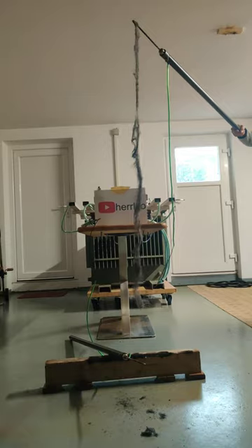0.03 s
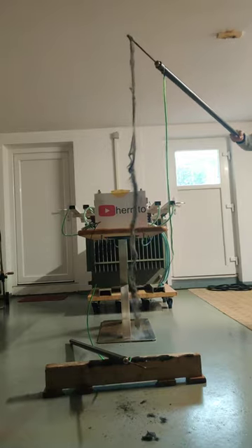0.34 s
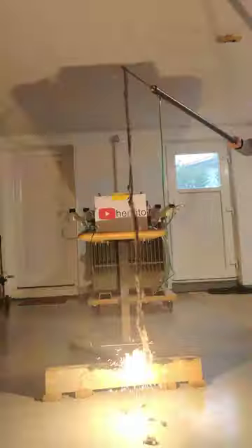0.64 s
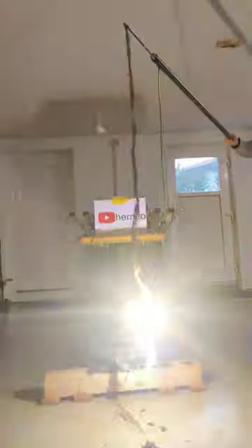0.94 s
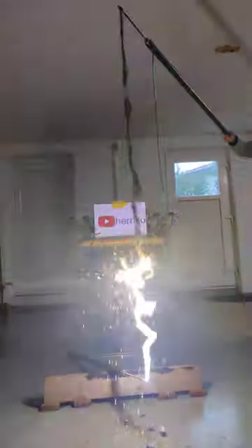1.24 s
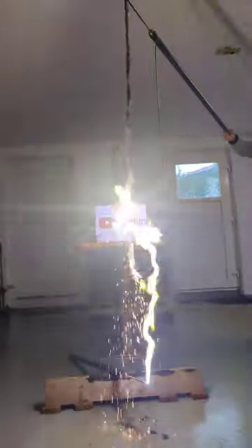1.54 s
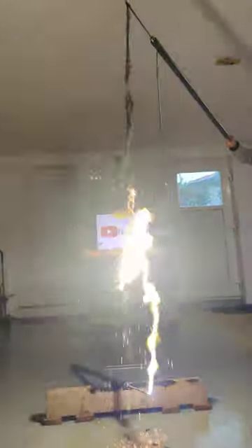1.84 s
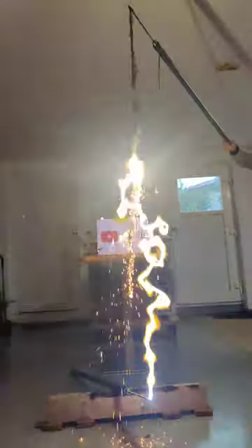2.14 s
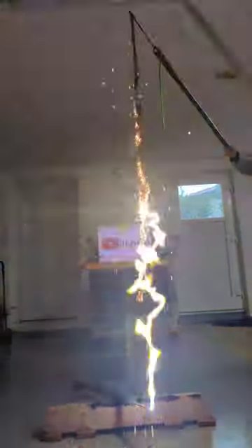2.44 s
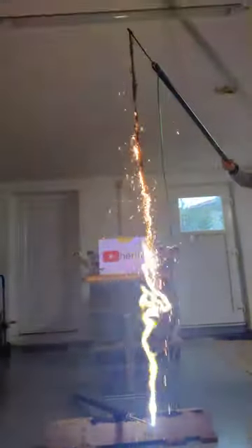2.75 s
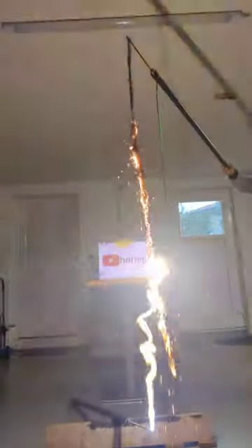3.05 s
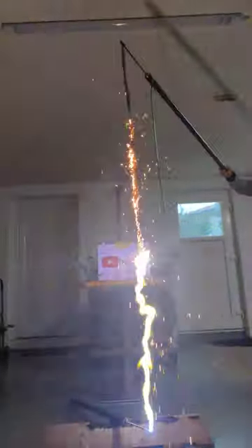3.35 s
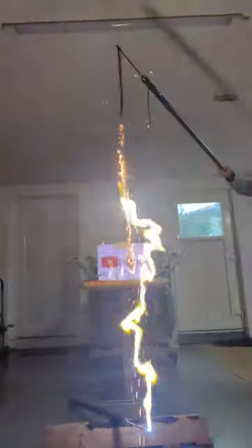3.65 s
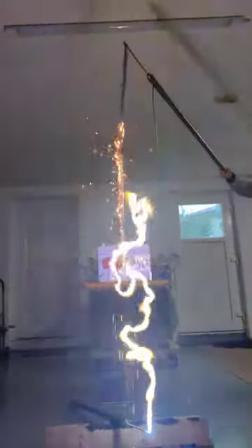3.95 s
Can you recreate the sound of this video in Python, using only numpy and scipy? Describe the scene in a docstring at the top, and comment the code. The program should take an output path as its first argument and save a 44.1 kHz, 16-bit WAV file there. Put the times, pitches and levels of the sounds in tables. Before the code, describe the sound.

A high-voltage arc buzzes loudly in a hard-walled room. It strikes with a spit of hiss after a faint hum, then swells into an uneven rasp with sharp cracks, crackling and the sizzle of burning wire wool.

```python
"""A transformer hums faintly in a hard-walled room. At 0.57 s a high-voltage arc strikes a hanging
strand of wire wool with a spit of hiss. The wool flares and sizzles, its flame stirs the room's low
modes, and the first sharp cracks sound as loops of the channel short out. From 0.86 s the arc buzzes,
one pressure pulse to each ripple of the rectified supply, louder as its channel lengthens.
From 1.2 s countless small collapses add a crackle."""
import sys
import numpy as np
from scipy import signal
from scipy.fft import rfft, irfft, next_fast_len
from scipy.io import wavfile
from scipy.ndimage import map_coordinates

SR = 44100
rng = np.random.default_rng(int(sys.argv[2]) if len(sys.argv) > 2 else 0)


def digitize_waveform(pressure):
    """Quantize a signal to 16-bit integers and store it at the path in sys.argv[1].

    Rows of a 2-D input are taken as channels; values are limited to [-1, 1].
    """
    field = np.atleast_2d(pressure).T
    bounded = np.clip(field, -1, 1)
    quanta = np.round(bounded * 32767).astype(np.int16)
    wavfile.write(sys.argv[1], SR, quanta)


N = 176400
T = np.arange(N) / SR
BURN_START_S, BURN_RISE_S = 0.633, 0.021
LEFT_RIGHT = np.array([[.5], [-.5]])  # shares a difference between the two channels
# strength of the arc: t/s, relative level/dB
ARC_STRENGTH = [(.88,-38),(1.0,-30),(1.12,-27.5),(1.3,-27),(1.5,-22.5),(1.79,-19),(1.83,-39),(1.895,-24),(1.915,-18.5),(2.095,-18.5),(2.12,-50),(2.195,-29),(2.22,-19),(2.33,-17),(2.34,-33),(2.41,-37),(2.44,-21),(2.69,-18.5),(2.79,-24.5),(2.92,-36.5),(2.95,-23),(3.05,-27.5),(3.26,-19),(3.41,-26),(3.44,-21),(3.54,-19.5),(3.57,-27.5),(3.7,-19.5),(3.875,-21),(3.893,-53),(4.0,-21)]


def amp(db):
    """Amplitude ratio of a level in decibels."""
    return 10 ** (np.asarray(db) / 20)


def unit(x):
    """Normalisation to an rms of 1."""
    return x / np.sqrt(np.mean(x ** 2) + 1e-20)


def along(points, hz):
    """Interpolation of (f/Hz, value) points on a logarithmic frequency axis."""
    f, values = np.transpose(points)
    return np.interp(np.log(hz + 1), np.log(f + 1), values)


def curve(points):
    """Linear interpolation of (t/s, value) points at every sample."""
    return np.interp(T, *np.transpose(points))


def fade_in(start_s, rise_s):
    """Linear onset from 0 to 1."""
    return np.clip((T - start_s) / rise_s, 0, 1)


def wobble(knots_per_s):
    """Random modulation: a spline through Gaussian values."""
    return map_coordinates(rng.standard_normal(1000), [T * knots_per_s], mode="mirror")


def filtered(x, response):
    """Linear filtering: the spectrum is multiplied by a frequency response."""
    size = next_fast_len(N + SR // 2)
    return irfft(rfft(x, size) * response(np.fft.rfftfreq(size, 1 / SR)), size)[..., :N]


def coloured(x, spectrum):
    """Zero-phase shaping by (f/Hz, level/dB) points."""
    return filtered(x, lambda hz: amp(along(spectrum, hz)))


def clicks(x, spectrum, size=4096):
    """Minimum-phase shaping: each impulse becomes a causal click of this spectrum and the same peak."""
    cepstrum = irfft(np.log(amp(along(spectrum, np.fft.rfftfreq(size, 1 / SR)))))
    cepstrum[1:size // 2] *= 2
    cepstrum[size // 2 + 1:] = 0
    click = irfft(np.exp(rfft(cepstrum)))
    return signal.fftconvolve(x, click / np.abs(click).max())[:N]


def impulses(times, sizes):
    """Fractional delay: each impulse is shared between two neighbouring samples."""
    at = np.clip(times * SR, 0, N)
    i = at.astype(int)
    before = np.bincount(i, sizes * (1 - at + i), N + 2)[:N]
    after = np.bincount(i + 1, sizes * (at - i), N + 2)[:N]
    return before + after


def decays(x, t60_s):
    """Exponential decay: each impulse starts an envelope that falls 60 dB in t60_s."""
    return signal.fftconvolve(x, amp(-60 * T[:SR // 4] / t60_s))[:N]


def grains(per_s, spread_db):
    """A Poisson process of impulses, a few much larger than the rest."""
    occurs = rng.random(N) < per_s / SR
    return occurs * amp(spread_db * np.minimum(rng.exponential(size=N), 4))


def diffuse(pair, hz):
    """Diffuse-field coherence: two independent spectra mix to a left and right alike at long waves."""
    # likeness of left and right: f/Hz, correlation
    coherence = [(60, 0.94), (250, 0.91), (500, 0.13), (1000, 0.033), (3000, 0.0067), (15000, 0.0074)]
    angle = np.arccos(np.clip(along(coherence, hz), -1, 1)) / 2
    mid, side = pair[0] * np.cos(angle), pair[1] * np.sin(angle)
    return np.array([mid + side, mid - side])


def diffuse_noise():
    """White noise at two points of a diffuse field."""
    spectra = rfft(rng.standard_normal((2, N)))
    return irfft(diffuse(spectra, np.fft.rfftfreq(N, 1 / SR)), N)


def room(x, wet_db, changes=5, size=16384):
    """Reverberation: direct sound plus a decaying tail that changes as the arc writhes about."""
    # reverberation time: f/Hz, T60/s
    t60 = [(100, 0.46), (500, 0.77), (2000, 0.27), (6000, 0.52), (15000, .2)]
    reverb = np.zeros((2, N + size))
    step = N // changes
    for centre in range(0, N + 1, step):
        hz, t, noise = signal.stft(rng.standard_normal((2, size)), SR, nperseg=256)
        decay = amp(-60 * t / along(t60, hz)[:, None])
        build_up = 1 - np.exp(-t / 0.0013)
        tail = signal.istft(diffuse(noise, hz[:, None]) * decay * build_up, SR, nperseg=256)[1][:, :size]
        start, end = max(centre - step, 0), min(centre + step, N)
        crossfade = np.cos(np.pi / 2 * (np.arange(start, end) - centre) / step)
        wet = signal.fftconvolve(x[None, start:end] * crossfade, tail / np.linalg.norm(tail[0]), axes=1)
        reverb[:, start:start + wet.shape[1]] += wet
    return (x + amp(wet_db - 0.5) * reverb[:, :N]) / np.hypot(1, amp(wet_db))


def floor_bounce(x, delay_s=.0032, echo_db=-4):
    """Comb filtering: the reflection off the concrete floor interferes with the direct sound."""
    return filtered(x, lambda hz: 1 + amp(echo_db) * np.exp(-2j * np.pi * hz * delay_s))


def arc_gain(exponent, reference_db=-20.5):
    """Power law: the gain of a layer that grows with the arc's strength."""
    return amp(exponent * (curve(ARC_STRENGTH) - reference_db)) * fade_in(BURN_START_S, BURN_RISE_S)


def hum():
    """A line spectrum from the mains transformer, louder on the right, over the room's ambient noise."""
    # transformer partials: f/Hz, level/dB
    partials = [(150.7, -84), (247.6, -66.5), (301.5, -71), (349.9, -74.5), (452.2, -84), (500.6, -84),
                (597.5, -87)]
    # ambient spectrum: f/Hz, relative level/dB
    ambient_spectrum = [(15,-0.5), (28,6.5), (60,-10), (150,-18), (400,-18.5), (800,-25), (2000,-26),
                        (7500,-35), (15500,-32)]
    tones = sum(amp(db) * np.sqrt(2) * np.sin(2 * np.pi * (hz * T + rng.random())) for hz, db in partials)
    ambient = amp(-59) * unit(coloured(diffuse_noise(), ambient_spectrum))
    return (amp(0.5 - 3 * LEFT_RIGHT) * tones + ambient) * fade_in(0.032, 0.0043)


def boom():
    """Forced resonance: the unsteady flame drives the room's low modes."""
    # room modes: f/Hz, bandwidth/Hz, relative level/dB
    modes = [(62, 6, 0), (95, 11, -5), (125, 16, -10), (158, 10, -7), (192, 10, -4), (220, 10, -5)]
    # envelope of the boom: t/s, level/dB
    level = [(.68,-57),(1.1,-48),(1.15,-38.5),(1.45,-34),(1.9,-46),(2.1,-30),(2.25,-38),(2.5,-31),(2.9,-35.5),(3.4,-33.5),(4,-35.5)]

    def response(hz):
        return sum(amp(db) * 1j * hz * width / (f0 * f0 - hz * hz + 1j * hz * width)
                   for f0, width, db in modes)

    rumble = unit(filtered(diffuse_noise(), response))
    return rumble * amp(curve(level)) * fade_in(BURN_START_S, BURN_RISE_S)


def sizzle():
    """Shot noise: fine fibres of the wool burst into sparks, whose clicks merge."""
    # envelope of the sizzle: t/s, relative level/dB
    level = [(.68,-30.5),(.82,-34),(.92,-37.5),(1.1,-33.5),(1.14,-27.5),(1.25,-31),(1.3,-27),(1.5,-27),(1.8,-23.5),(1.89,-30.5),(1.93,-24),(2.1,-29),(2.13,-32.5),(2.2,-28),(2.24,-27),(2.33,-21),(2.38,-30),(2.46,-29),(2.72,-23.5),(2.92,-31),(2.97,-26.5),(3.4,-31.5),(3.6,-25.5),(3.86,-24.5),(3.92,-38),(4,-31)]
    # spectrum of one spark: f/Hz, relative level/dB
    spectrum = [(25,-38), (70,-7), (180,-7), (320,-3), (550,-3.5), (1450,-0.5), (2500,-1.5), (3400,-6.5),
                (5000,-6), (6500,-12.5), (8800,-21), (12000,-16), (15500,-7.5)]
    sparks = grains(per_s=5000, spread_db=6.5) * rng.choice([-1, 1], N)
    envelope = amp(curve(level) + 2.5 + 1.7 * wobble(45)) * fade_in(BURN_START_S, BURN_RISE_S)
    return unit(clicks(sparks, spectrum)) * envelope


def crackle():
    """Random rarefaction pulses: countless small collapses, once the channel is long enough to loop."""
    # spectrum of one collapse: f/Hz, relative level/dB
    spectrum = [(10,-43), (35,-9), (70,-1), (150,-25.5), (350,0.5), (700,1), (1100,-4), (1500,0.5),
                (2500,-7.5), (3500,-12.5), (5000,-16), (8000,-30.5), (15000,-43)]
    pops = unit(floor_bounce(clicks(-grains(per_s=1500, spread_db=3.0), spectrum)))
    flicker = amp(-28.5 + 3.7 * wobble(25.1))
    return pops * flicker * arc_gain(exponent=0.72) * fade_in(1.2, 0.011)


def ignition(strike_s=.5688, flare_s=0.667):
    """Amplitude-modulated noise: the first spark, its spit of hiss, and a flare as the wool catches."""
    # spectrum of the hiss: f/Hz, relative level/dB
    spectrum = [(30,-35), (120,-11), (400,-18.5), (1500,-15.5), (2500,-7.5), (3900,-15.5), (5000,-2.5),
                (7000,-11.5), (9000,-14.5), (11600,-7.5), (12900,-1), (15600,0.5)]
    spark_t60_s, spit_t60_s = 0.032, 0.76
    flare_hold_s, fall_db_per_s = 0.19, 130
    age = np.maximum(T - strike_s, 0)
    spark = amp(-15 - 60 * age / spark_t60_s)
    spit = amp(-24 - 60 * age / spit_t60_s)
    fall_db = fall_db_per_s * np.maximum(T - flare_s - flare_hold_s, 0)
    flare = amp(-33 - fall_db + 1.6 * wobble(76.4)) * fade_in(flare_s, .004)
    envelope = (spark + spit) * fade_in(strike_s, 0.00044) + flare
    return unit(coloured(rng.standard_normal(N), spectrum)) * envelope


def cracks():
    """Pressure transients: a loop shorts out, the old channel collapses with a thump, the new snaps."""
    # short circuits: t/s, relative thump level/dB, relative snap level/dB
    shorts = [(0.7256, -16, -16), (0.7973, -28, -22), (0.816, -39, -19), (.845, -34, -22),
              (0.991, -25, -33), (1.127, -4.5, -26), (1.182, -11, -36), (1.2642, -10.5, -18),
              (1.2756, -17, -15), (1.324, -5, -19), (1.3608, -7, -21), (1.441, -8, -19), (1.534, -23, -30),
              (1.601, -5, -23), (1.703, -5, -14), (1.8104, 0.5, -16.5), (1.824, -29, -27),
              (2.063, 1.5, -29), (2.1124, -4, -16.5), (2.2583, 0, -25), (2.3421, -1, -13.5),
              (2.514, 0, -21.5), (2.573, -5, -19), (2.673, 0, -34), (2.6825, 0, -20.5),
              (2.8065, -3.5, -20.5), (2.8546, -3, -19.5), (2.9612, 2, -24), (3.0254, 1, -17.5),
              (3.172, -5, -21), (3.2814, -2.5, -24), (3.3404, -0.5, -16.5), (3.529, -6, -27),
              (3.5551, 1, -16), (3.831, 3.5, -30), (3.8908, -7, -16)]
    # spectra of thump and snap: f/Hz, relative level/dB
    thump_spectrum = [(8,-50), (30,1), (70,-4), (300,-1.5), (900,1.5), (1600,-3), (3000,-11.5), (5000,-8.5),
                      (9000,-47), (15000,-40)]
    snap_spectrum = [(300, -18), (2000, -3), (4000, -1), (6000, -1), (8500, -8), (12000, -2), (15500, 3)]
    times, thump_db, snap_db = np.transpose(shorts)
    collapses = impulses(times, -amp(thump_db - 1))
    ragged_tails = amp(-22) * decays(collapses, t60_s=0.03) * rng.standard_normal(N)
    thumps = floor_bounce(clicks(collapses + ragged_tails, thump_spectrum))
    snap_envelope = decays(impulses(times, amp(snap_db - 0.5)), t60_s=0.024)
    snaps = floor_bounce(snap_envelope * unit(coloured(diffuse_noise(), snap_spectrum)))
    in_room = room(thumps + amp(4) * snaps.mean(0), wet_db=5)
    return amp(-6) * thumps + snaps + amp(-2.5) * in_room


def buzz():
    """A harmonic pulse train: each current ripple emits a pulse, fuller and deeper from a strong arc."""
    # ripple frequency of the rectified supply: t/s, f/Hz
    ripple = [(.9,299.8),(1.3,300.4),(1.65,301.2),(1.8,301.8),(1.95,300.2),(2.08,300.6),(2.2,300.6),(2.32,302.4),(2.42,299.6),(2.8,299.9),(3.2,300.6),(3.52,302),(3.62,300.4),(3.85,301.4),(4,300)]
    # pulse spectra of a strong and a weak arc: f/Hz, relative level/dB
    full_spectrum = [(20,-60), (150,-24), (300,-7), (600,-1.3), (900,-.7), (1200,-6), (1500,-1), (1800,-11),
                     (2100,-16), (2400,-13.5), (3000,-16.5), (3500,-22), (5000,-24), (8000,-44)]
    thin_spectrum = [(20,-60), (150,-25), (300,-10), (600,-5), (900,-3), (1200,-9), (1500,1), (1800,-13),
                     (2100,-8), (2400,-13), (3000,-13), (4000,-22), (8000,-44)]
    wander_hz, jitter_s, scatter_db = 0.725, .00002, 1
    thin_db, full_db = -33, -24  # arc strengths between which the timbre changes
    cycles = np.cumsum(curve(ripple) + wander_hz * wobble(14)) / SR
    times = np.interp(np.arange(1, int(cycles[-1])), cycles, T)
    jitter, scatter = rng.standard_normal((2000, 2))[:len(times)].T
    pulses = impulses(times + jitter_s * jitter, amp(scatter_db * scatter))
    strength_db = curve(ARC_STRENGTH)
    fullness = np.clip((strength_db - thin_db) / (full_db - thin_db), 0, 1)
    full = fullness * unit(coloured(pulses, full_spectrum))
    thin = (1 - fullness) * unit(coloured(pulses, thin_spectrum))
    rasp = (full + thin) * amp(strength_db - 2) * fade_in(.86, .05)
    fundamental = np.cos(2 * np.pi * cycles) * amp(-33.5) * arc_gain(exponent=2.8)
    return room(rasp, wet_db=-6.5, changes=18) + fundamental


def scene():
    """Superposition of hum and arc; the arc's sound is cut off below the room's lowest mode."""
    arc = boom() + buzz() + cracks()
    arc += room(crackle(), wet_db=1.5)
    arc += room(sizzle(), wet_db=6.5)
    arc += room(ignition(), wet_db=3.5, changes=2)
    low_cut = signal.butter(4, 50, "high", fs=SR, output="sos")
    return hum() + signal.sosfilt(low_cut, arc)


def record(dry):
    """Level and time differences of two unlike, spaced microphones, then clipping and a band limit."""
    # left minus right: f/Hz, level/dB
    imbalance = [(60, 0.5), (110, -3), (200, -2), (380, 1), (700, 1.5), (1290, -5), (2380, -2.0),
                 (4400, -0.5), (8120, 0.5), (15000, -3.5)]
    right_lag_s, top_hz = .000025, 15850

    def microphones(hz):
        gain = amp(along(imbalance, hz) * LEFT_RIGHT)
        return gain * np.exp(2j * np.pi * hz * right_lag_s * LEFT_RIGHT)

    clipped = np.clip(filtered(dry, microphones), -.95, .95)
    return filtered(clipped, lambda hz: 1 / (1 + (hz / top_hz) ** 200))


dry = scene()
out = record(dry)
digitize_waveform(out)
```